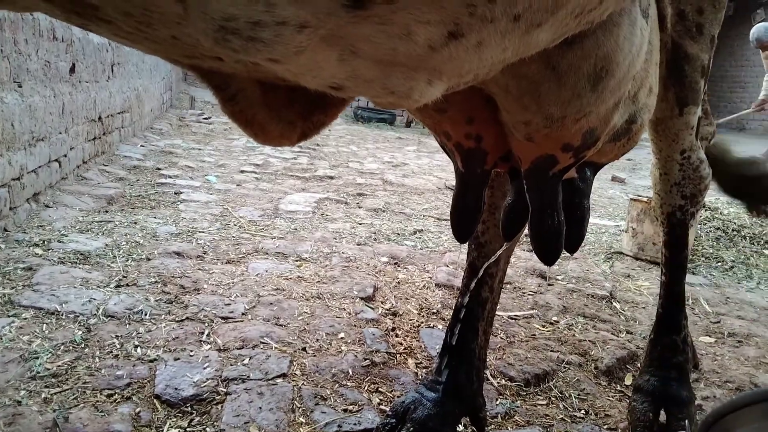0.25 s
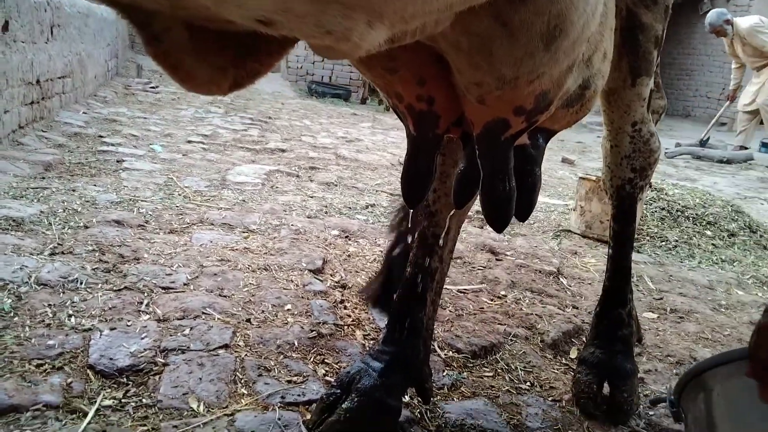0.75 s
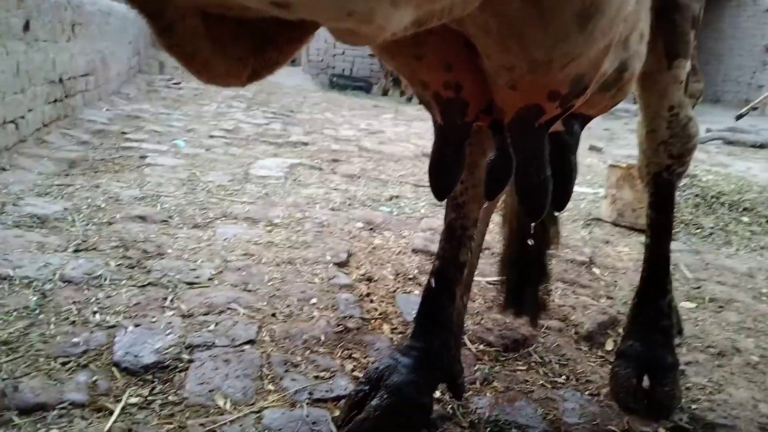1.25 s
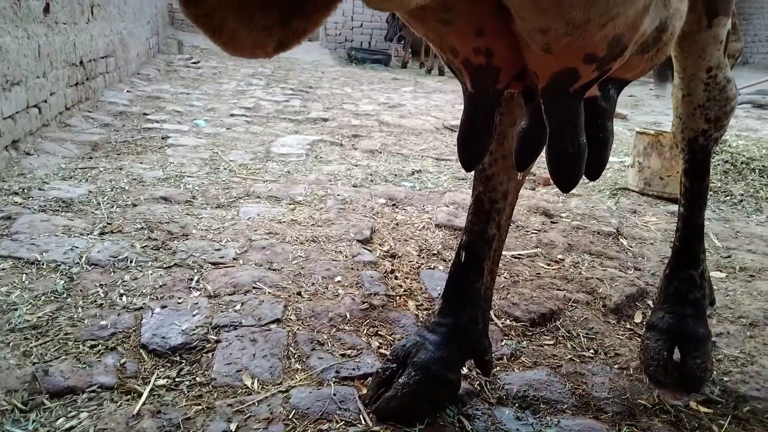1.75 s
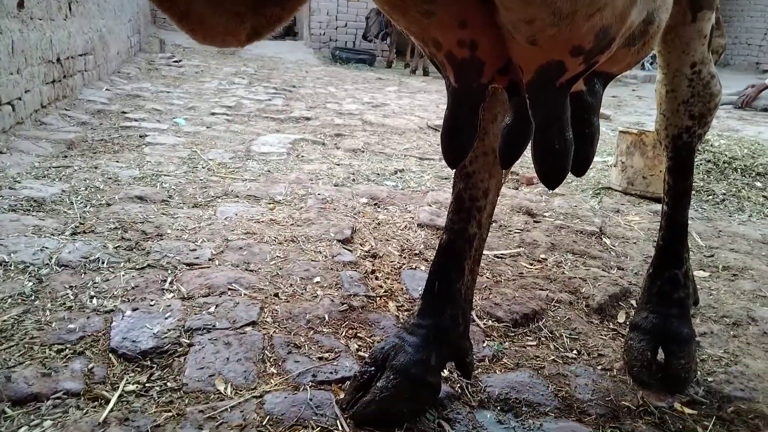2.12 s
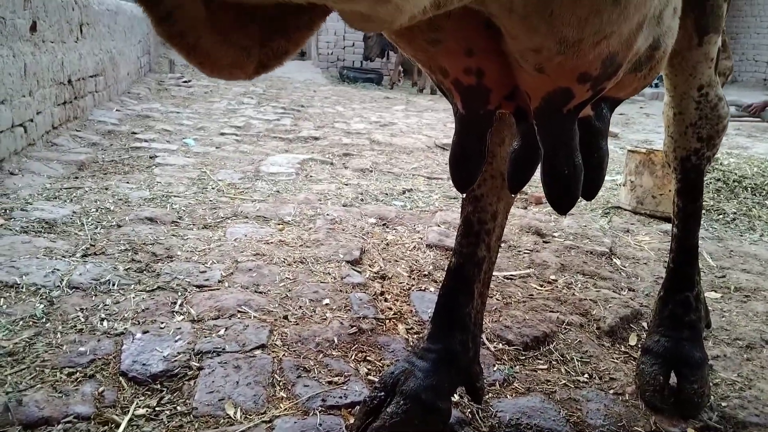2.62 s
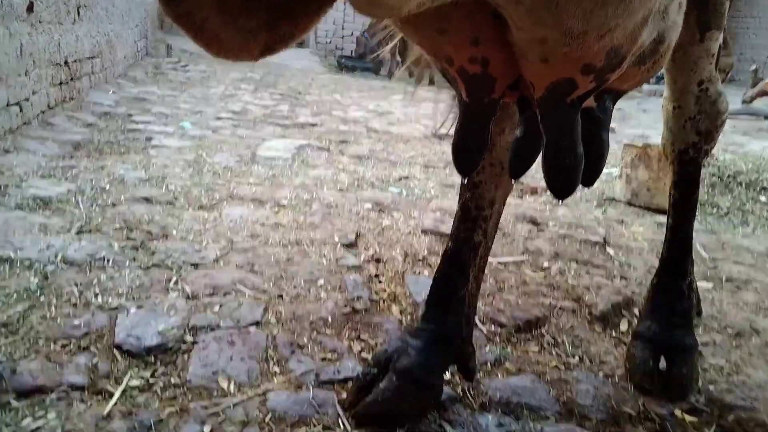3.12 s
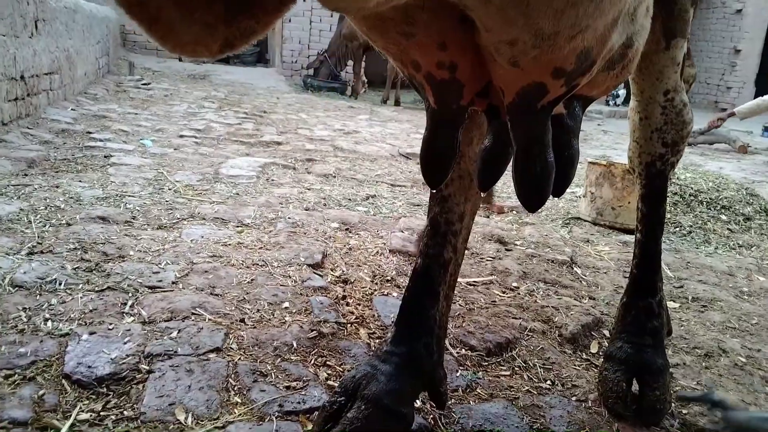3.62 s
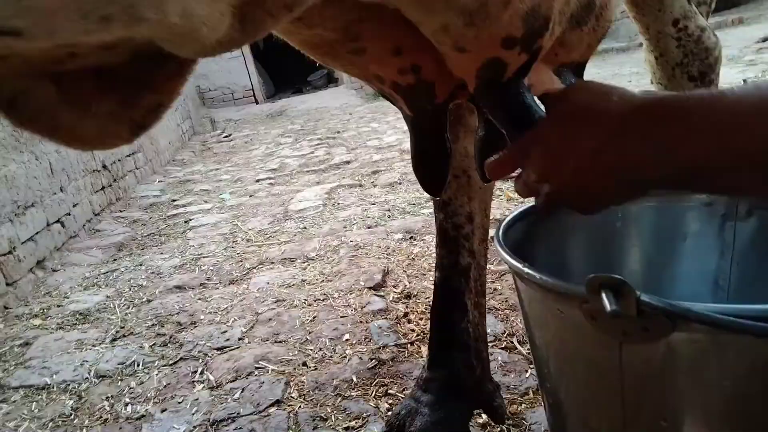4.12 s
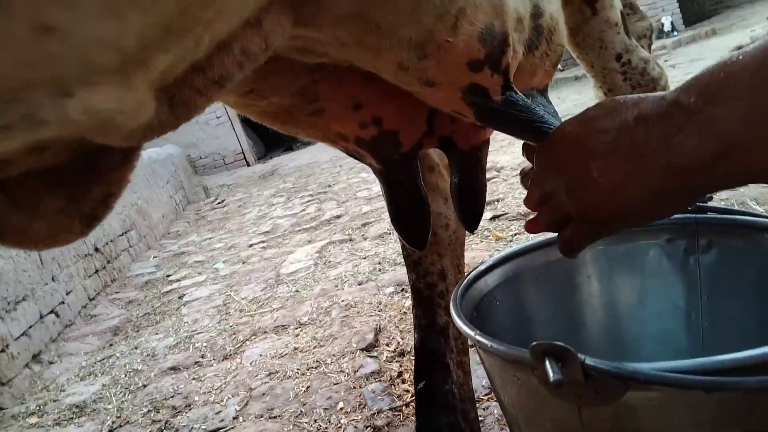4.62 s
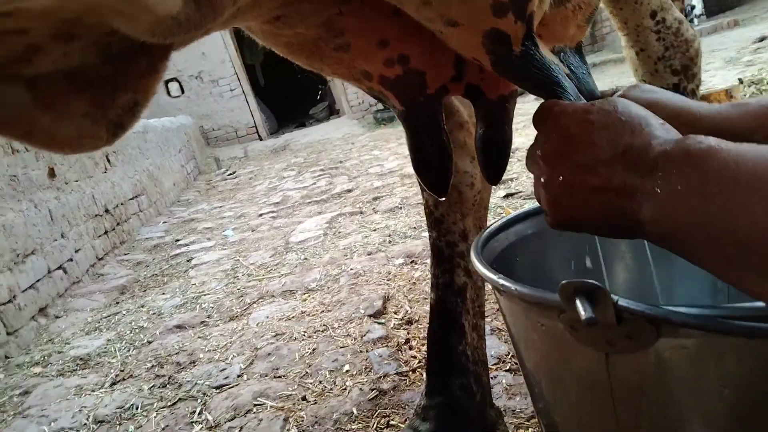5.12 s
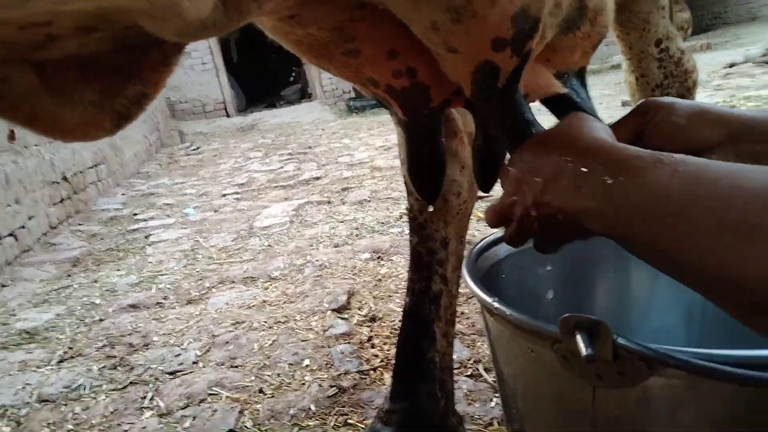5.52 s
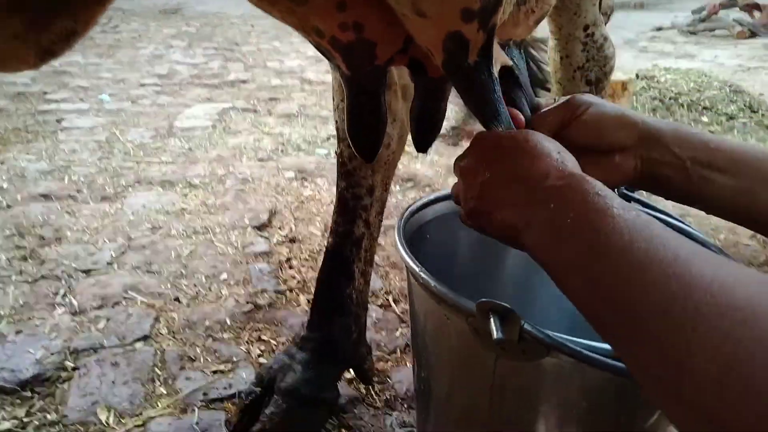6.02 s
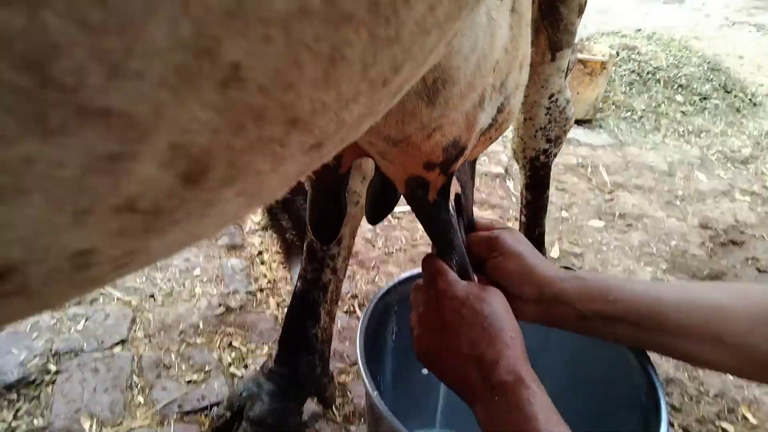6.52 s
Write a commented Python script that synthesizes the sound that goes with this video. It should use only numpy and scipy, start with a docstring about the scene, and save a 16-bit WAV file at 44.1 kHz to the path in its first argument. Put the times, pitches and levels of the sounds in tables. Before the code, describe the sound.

A dry, close sound in a quiet open yard, with almost no background. From 0 to 1.3 seconds water moves lightly in a steel bucket: small drips, a few sharper plops and faint rings. From about 1.4 seconds it is swilled harder, with dense wet splashes, low hollow gurgles and a booming bucket body, rising and easing through 3.5 seconds. The biggest splash and deep glugs come at 3.7 to 3.95, then it drops away quickly. Soft broom-like swishes pass at about 4.2, 4.4 and 4.6, where a quick double metallic knock lands. From 4.93 to 5.4 a jet of milk hisses and drums on bare steel, ringing tinnily. Another faint swish follows, then a short clank at 5.67 and two quieter brushes near 5.9 and 6.1. At 6.25 a second jet strikes, hollower, with low gulps, fading by 6.7. Dull ground bumps run underneath.

```python
"""Milking yard with a steel bucket

Water is slopped about in the bucket: patchy noise and drops, splashes, gurgling air pockets and a hollow boom.
Knocks excite damped steel modes; two jets of milk, one after the other, hiss and drum on the bare steel.
Broom-like strokes of noise come and go, with faint rings, dull bumps through the ground and a faint hush.
"""
import sys
import numpy as np
from scipy import signal
from scipy.fft import rfft, irfft
from scipy.io import wavfile
from scipy.ndimage import uniform_filter1d

SR = 44100
rng = np.random.default_rng(int(sys.argv[2]) if len(sys.argv) > 2 else 0)


def store_pcm(level_fs):
    """Save levels as 16-bit WAV."""
    pcm = np.round(np.clip(level_fs, -1, 1) * 32767).astype(np.int16)
    wavfile.write(sys.argv[1], SR, np.atleast_2d(pcm).T)


N = 297675
TIME = np.arange(N) / SR

# spectrum of moving water: (frequency [Hz], relative density [dB])
WATER_COLOUR = [(410, -28), (700, -6.5), (797, -5.5), (1020, 1.5), (1210, -2.5), (1490, 3), (1780, -0.5),
                (2920, -3.5), (4540, -16), (5800, -12), (8790, -37.5), (12500, -37), (15600, -43)]
# spectrum of the broom strokes and the hush: (frequency [Hz], relative density [dB])
BROOM_COLOUR = [(110, -69.5), (180, -24), (292, -10), (327, -24.5), (387, 3), (425, -5), (594, -6.5),
                (1020, -10), (1230, -2), (1330, -1), (1540, -2), (1890, -8.5), (5270, -15.5), (8410, -32),
                (15600, -35)]
# wall modes: (frequency [Hz], width [Hz], level at first jet's landing [dB], level at second's [dB])
WALL_MODES = [(957, 14, -7, -15), (1021, 16, -8, -9), (1119, 14, -5, -13), (1191, 15, -11, -7),
              (1305, 28, -14, -6), (1504, 22, -8, -12), (1550, 28, -9, 0), (1652, 20, -14, -6),
              (1712, 18, -5, -12), (1805, 22, -2, -9), (1885, 28, 2, -3), (2200, 40, -8, -12),
              (2310, 30, -7, -8), (2400, 20, -5, -13), (2500, 35, -7, -7), (2600, 25, -13, -8),
              (2736, 24, -7, -13), (3020, 32, -14, -11), (3296, 30, -18, -11), (4580, 30, -19, -18),
              (5640, 50, -17, -20), (6090, 30, -13, -20), (6370, 40, -15, -20)]


def gain_of(db):
    """Decibels to an amplitude factor."""
    return 10 ** (np.asarray(db) / 20)


def evened(x):
    """Scales to rms 1."""
    return x / np.sqrt(np.mean(x ** 2) + 1e-20)


def add(mix, start_s, sound):
    """Mixes a sound in from start_s."""
    part = mix[round(start_s * SR):][:len(sound)]
    part += sound[:len(part)]


def played(rows):
    """Gains from the dB columns of a timed table, silent outside it."""
    time_s, *columns = np.transpose(rows)
    return [gain_of(np.interp(TIME, time_s, db, -200, -200)) for db in columns]


def resonate(x, hz, width_hz):
    """One two-pole resonance of peak gain about 1."""
    r = np.exp(-np.pi * width_hz / SR)
    b = [(1 - r * r) / 2, 0, -(1 - r * r) / 2]
    a = [1, -2 * r * np.cos(2 * np.pi * hz / SR), r * r]
    return signal.lfilter(b, a, x)


def ringing(x, modes):
    """Sum of the resonances of a body."""
    return sum(gain_of(db) * resonate(x, hz, width_hz) for hz, width_hz, db in modes)


def coloured(x, points):
    """Filters by the table, interpolated over log frequency; rms 1."""
    point_hz, point_db = np.transpose(points)
    hz = np.fft.rfftfreq(len(x), 1 / SR)
    db = np.interp(np.log(hz + 1), np.log(point_hz), point_db)
    return evened(irfft(rfft(x) * gain_of(db), len(x)))


def lifted(x, hz, db):
    """Raises or cuts the treble above hz by db."""
    highpass = signal.butter(2, hz, "high", fs=SR, output="sos")
    treble = signal.sosfiltfilt(highpass, x)
    return x + (gain_of(db) - 1) * treble


def lumpy(flicker_db, clump_s):
    """Noise whose strength flickers by flicker_db rms, as drops land in clumps."""
    clumps = evened(uniform_filter1d(rng.standard_normal(N), max(round(clump_s * SR), 1)))
    return evened(rng.standard_normal(N) * gain_of(flicker_db * clumps))


def patchy(x, patchy_db):
    """Drops of one size come in groups: short patches of time and pitch stand out."""
    z = signal.stft(x, nperseg=512)[2]
    across_pitch = uniform_filter1d(rng.standard_normal(z.shape), size=5, axis=0)
    patches = evened(uniform_filter1d(across_pitch, size=6, axis=1))
    return evened(signal.istft(z * gain_of(patchy_db * patches), nperseg=512)[1][:N])


def blow(t, rise_s, t60_s):
    """Quick rise, exponential fall of 60 dB in t60_s."""
    return (1 - np.exp(-t / rise_s)) * gain_of(-60 * t / max(t60_s, .02))


def swell(start_s, end_s, db, rise_db_per_s, fall_db_per_s):
    """Gain that climbs to db, holds from start to end and sinks, linearly in dB."""
    before_s = np.maximum(start_s - TIME, 0)
    after_s = np.maximum(TIME - end_s, 0)
    return gain_of(db - rise_db_per_s * before_s - fall_db_per_s * after_s)


def wash():
    """Patchy water noise with single drops, and the hollow boom of the bucket."""
    # (time [s], water level [dB], boom level [dB])
    wash_levels = [(0.0, -56, -51), (0.15, -77.5, -100), (0.43, -68.5, -88), (0.46, -44.5, -58),
                   (0.6, -62.5, -58), (0.82, -48, -59.5), (1.12, -56, -72), (1.15, -43.5, -44),
                   (1.31, -40, -50), (1.42, -54, -58), (1.45, -34.5, -40), (1.68, -47.5, -40),
                   (1.85, -37.5, -37), (2.03, -50.5, -52.5), (2.33, -36.5, -44), (2.42, -52.5, -44.5),
                   (2.55, -52.5, -48), (2.6, -43, -55.5), (2.83, -44.5, -52), (2.9, -51.5, -52),
                   (3.06, -56, -45.5), (3.09, -50.5, -46), (3.4, -41, -37), (3.5, -39, -53.5),
                   (3.64, -57.5, -61), (3.74, -36.5, -43), (3.89, -38, -37.5), (4.1, -57.5, -58)]
    # air and walls of the bucket, applied twice: (frequency [Hz], width per pass [Hz], gain per pass [dB])
    air_modes = [(313, 7.9, 4.5), (393, 172, 4), (542, 100, 0)]
    gain, hollow = played(wash_levels)
    noise = patchy(coloured(lumpy(1.86, 0.011), WATER_COLOUR), patchy_db=5.5)
    water = .8 * noise + .6 * droplets(per_s=500, spread_db=4.5)
    boom = evened(ringing(ringing(lumpy(5.5, 0.039), air_modes), air_modes))
    return gain * (lifted(water, 6600, 6.5) + ticks()) + hollow * boom


def droplets(per_s, spread_db):
    """Single small drops: short rising blips of many pitches, a few of them large."""
    out, t = np.zeros(N), np.arange(600) / SR
    pitches_hz = np.geomspace(900, 7000, num=16)
    for hz in pitches_hz:
        size = gain_of(spread_db * np.minimum(rng.exponential(1, N), 4))
        hits = size * (rng.random(N) < per_s / len(pitches_hz) / SR)
        cycles = hz * t
        blip = np.sin(2 * np.pi * cycles * (1 + 0.0072 * cycles)) * cycles * np.exp(-cycles / 3.8)
        out += signal.oaconvolve(hits, blip / np.linalg.norm(blip))[:N]
    return coloured(out, WATER_COLOUR)


def ticks():
    """Fine spray bursting on the wall: brief noise ticks at random moments, treble cut."""
    # (time [s], level against the wash [dB])
    tick_levels = [(0.0, -24), (1.4, -29), (3.25, -26), (3.32, -18), (4.1, -13)]
    ticks_per_s = 70
    size = gain_of(5 * np.minimum(rng.exponential(1, N), 3))
    hits = size * (rng.random(N) < ticks_per_s / SR)
    envelope = signal.oaconvolve(hits, blow(np.arange(1500) / SR, .0008, 0.041))[:N]
    bursts = envelope * rng.standard_normal(N)
    return played(tick_levels)[0] * evened(lifted(bursts, 5300, -43))


def splashes():
    """Each splash is a burst of spray plus one size of drop ringing at its own pitch."""
    # (time [s], peak [dB], drop pitch [Hz], spray against drops [dB], spray treble lift [dB])
    splash_rows = [(0.0263, -42, 3190, 5, 35), (0.1955, -45.5, 3320, -25, 39),
                   (0.2858, -43.5, 1870, -16, 15), (0.3135, -46.5, 2680, -15.5, 11),
                   (0.365, -57, 2110, -14, 16), (0.4477, -32, 1440, 9, 10), (0.5437, -40.5, 3240, -12, 13),
                   (0.5854, -40.5, 3000, -2, 13), (0.621, -36, 1570, -8, 0), (0.6634, -38, 2680, -11, -5),
                   (0.6894, -42, 1336, -2, 14), (0.7307, -37, 1420, -4, 11), (0.821, -35, 3380, -13, 14),
                   (0.8998, -25.5, 1514, -14.5, 18.5), (0.9423, -37.5, 1550, 3, 26),
                   (1.0195, -36.5, 1460, -1, 11), (1.0959, -44, 2450, -15, 9), (1.146, -32.5, 1190, -4, 9),
                   (1.2103, -34.5, 2680, -4, 18), (1.333, -34, 1490, -12, 15), (1.3778, -39, 2720, -4, -1),
                   (1.4351, -26, 1030, -22, -7), (1.476, -21, 1330, -1, 4), (1.5298, -30.5, 1930, 10, -2),
                   (1.5702, -27.5, 3180, -4, 10), (1.5967, -25.5, 1720, 6, 1),
                   (1.6387, -26.5, 1015, 3, 7.5), (1.709, -29, 1650, -8.5, 14), (1.764, -28, 1330, -11, -9),
                   (1.8149, -21.5, 2216, -1, 2), (1.8494, -32, 1490, -10, -12), (1.8862, -25, 1480, -5, -9),
                   (1.9473, -28, 1730, 7, 0), (2.075, -35, 1590, -2, 2), (2.138, -30.5, 1310, -8, 1),
                   (2.159, -29, 1040, 1, 11), (2.2125, -31.5, 2340, 0, 14), (2.2543, -46, 1420, -5, 7),
                   (2.291, -35, 1420, -7, 5), (2.3487, -28, 930, -5.5, 4), (2.427, -28, 960, -9, 0),
                   (2.4877, -41, 1560, 0, 26), (2.579, -27.5, 2280, -12.5, 15),
                   (2.6254, -26.5, 1060, -4.5, 0), (2.673, -25, 1685, 1, 13.5),
                   (2.7171, -24.5, 1700, -3.5, 2.5), (2.7722, -29, 1405, 1, -14),
                   (2.8368, -29, 1460, -2, -6), (2.9053, -38.5, 1310, -2, 11), (2.93, -34, 2100, -2, 5),
                   (2.991, -33.5, 1650, 5, 6), (3.017, -31, 2300, 1, 3.5), (3.038, -38.5, 1500, -2, 12),
                   (3.0769, -24.5, 1530, -7, 4.5), (3.1384, -27, 1680, -3, -17),
                   (3.1714, -33.5, 2140, -7, 3), (3.2125, -30, 1372, -8, 10),
                   (3.3022, -29.5, 1310, -10, 17), (3.3385, -25, 2480, -2, 8), (3.3807, -25, 1260, -11, 0),
                   (3.4357, -24.5, 1510, 12, 4.5), (3.4631, -22, 1480, -10, -1), (3.4894, -43, 1300, 0, 20),
                   (3.5944, -46, 1600, -2, 26), (3.6685, -34.5, 1220, -7, 8), (3.6985, -29, 2190, -10, 13),
                   (3.7306, -18.5, 1345, 4, -6), (3.7605, -17, 1030, 1.5, -2.5), (3.8551, -29, 1300, -9, 9),
                   (3.901, -30.5, 1470, -9, 14), (4.0006, -39, 1850, -10, 20),
                   (4.0448, -37.5, 1680, -14, 10)]
    rise_s, spray_t60_s, drops_t60_s = 0.0014, 0.15, 0.089
    out, t = np.zeros(N), np.arange(10240) / SR
    noises = rng.standard_normal((len(splash_rows), 2, len(t)))
    for (s, db, hz, spray_db, treble_db), (wide, narrow) in zip(splash_rows, noises):
        spray = gain_of(spray_db) * lifted(coloured(wide, WATER_COLOUR), 3100, treble_db)
        drops = evened(resonate(resonate(narrow, hz, 130), hz, 130))
        sound = blow(t, rise_s, spray_t60_s) * spray + blow(t, rise_s, drops_t60_s) * drops
        add(out, s - .002, gain_of(db) * sound / abs(sound).max())
    return out


def gurgles():
    """Air pockets closing under water ring at their own pitch, rising a little, shaken by the water."""
    # (time [s], level before rise and decay [dB], starting pitch [Hz], t60 [s])
    gurgle_rows = [(0.456, -33, 354.5, 0.19), (0.488, -26.5, 391.6, 0.21), (0.522, -35.5, 376.4, 0.41),
                   (0.56, -37, 379, 0.17), (0.909, -45, 377.5, 0.57), (1.025, -39, 304.5, 0.18),
                   (1.474, -21.5, 305, 0.053), (1.508, -22, 302, 0.24), (1.584, -29, 325, 0.17),
                   (1.709, -26, 442, 0.061), (1.849, -39, 303, 0.053), (1.88, -32, 293, 0.14),
                   (1.947, -19, 310, 0.095), (2.047, -19.5, 358, 0.035), (2.276, -42, 331, 0.19),
                   (2.308, -24.5, 324, 0.074), (2.432, -37, 306, 0.16), (2.527, -34, 265.5, 0.23),
                   (2.671, -38, 860, 0.099), (2.729, -36, 917, 0.14), (2.753, -29.5, 336, 0.091),
                   (2.816, -24.5, 491, 0.1), (2.839, -21.5, 375, 0.056), (2.866, -31.5, 320, 0.076),
                   (2.99, -35, 352, 0.15), (3.159, -50, 542, 0.065), (3.197, -28, 509, 0.14),
                   (3.21, -21, 588, 0.087), (3.38, -36, 400, 0.16), (3.439, -35.5, 400, 0.19),
                   (3.686, -37, 310, 0.071), (3.738, -24, 370, 0.12), (3.752, -21, 508, 0.37),
                   (3.757, -17.5, 593, 0.16), (3.796, -13, 322.5, 0.24), (3.858, -18.5, 334.5, 0.17),
                   (3.901, -18.5, 278, 0.14), (3.931, -17.5, 294.4, 0.18), (3.93, -31.5, 698, 0.23),
                   (3.95, -28.5, 580, 0.24), (4.363, -53, 534, 0.38), (4.02, -36.5, 329, 0.18),
                   (4.501, -38, 763, 0.14), (6.425, -22.5, 407.6, 0.34), (6.53, -27.5, 409, 0.17),
                   (6.615, -28.5, 309.4, 0.24)]
    rise_s, wobble_share = 0.0079, 0.44
    out, t = np.zeros(N), np.arange(12000) / SR
    shake = rng.standard_normal((len(gurgle_rows), len(t)))
    for (s, db, hz, t60_s), noise in zip(gurgle_rows, shake):
        tone = np.sin(2 * np.pi * hz * (t + .2 * t ** 2))
        wobble = evened(resonate(resonate(noise, hz, 90), hz, 90))
        add(out, s - .004, gain_of(db) * blow(t, rise_s, t60_s) * (tone + wobble_share * wobble))
    return out


def knocks():
    """A sharp push with a little grit, the damped steel modes and a dull thump."""
    # (time [s], knock level [dB], thump level before rise and decay [dB], thump pitch [Hz])
    knock_rows = [(4.6215, -53, -13.5, 153), (4.6281, -21.5, -38, 325), (4.6418, -21, -40, 322),
                  (4.6708, -30, -26.5, 170), (5.666, -17.5, -30, 360), (5.697, -26, -30, 420),
                  (5.766, -39, -40, 380)]
    out, t = np.zeros(N), np.arange(6000) / SR
    cracks = rng.standard_normal((len(knock_rows), len(t)))
    u = t / .00022
    push = -2.5 * u * (2 - u) * np.exp(-u)
    for (s, db, thump_db, hz), noise in zip(knock_rows, cracks):
        grit = coloured(noise, WATER_COLOUR) * blow(t, 0.0008, 0.014)
        steel = evened(ringing(noise, np.array(WALL_MODES)[:, :3])) * blow(t, 0.00044, 0.062)
        thump = -np.sin(2 * np.pi * hz * t) * blow(t, 0.0033, 0.028)
        knock = push + 0.23 * grit + 0.11 * steel
        add(out, s - .0005, gain_of(db) * knock + gain_of(thump_db) * thump)
    return out


def jets():
    """A jet breaks into a dense hail of drops: hiss, steel modes kept ringing, and a bottom boom."""
    # one table a jet: (time [s], force [dB], boom of the bucket bottom [dB])
    jet_levels = [
        [(4.916, -70, -88), (4.93, -38.5, -48), (4.95, -27, -34.5), (5.0, -21, -42), (5.09, -18.5, -47),
         (5.148, -22.5, -50), (5.25, -23, -42), (5.42, -41, -46.5), (5.6, -64, -82)],
        [(6.224, -55, -64), (6.24, -35, -45), (6.288, -21, -39), (6.405, -19.5, -44), (6.44, -18, -34),
         (6.5, -22, -30), (6.626, -32.5, -37), (6.7, -35, -40), (6.75, -43, -42)],
    ]
    # hiss, one table a jet: (frequency [Hz], relative density [dB])
    hiss_colours = [
        [(290, -61), (500, -81), (792, 2.5), (864, -41), (928, -28), (1140, -7), (1410, -1), (1820, 6),
         (2050, -5), (2360, -3.5), (4080, -10), (6290, -4.5), (8150, -25.5), (15600, -12)],
        [(290, -41.5), (500, -10), (569, -14.5), (792, -11), (851, -27), (1040, -27), (1430, 2), (1560, -13),
         (1720, -6.5), (2610, -15.5), (3860, -17), (5680, -14), (9010, -32.5), (15600, -17.5)],
    ]
    # applied twice: (frequency [Hz], width per pass [Hz], first jet's gain per pass [dB], second's [dB])
    bottom_modes = [(308, 11.6, -9.5, 2.5), (327, 9.7, 5.5, -3), (395, 32, 7.5, -5), (415.7, 33.5, 7.5, 5),
                    (502, 73, -23.5, -1), (799, 14, -5, 3)]
    steel_share = 0.83  # amplitude; the hiss takes the rest of the power
    out = np.zeros(N)
    for k, rows in enumerate(jet_levels):
        force, hollow = played(rows)
        hiss = force * patchy(coloured(lumpy(0.57, 0.036), hiss_colours[k]), patchy_db=2.0)
        walls = np.array(WALL_MODES)[:, [0, 1, 2 + k]]
        bottom = np.array(bottom_modes)[:, [0, 1, 2 + k]]
        # the landing spot wanders, so two sets of modes swell and fade apart
        steel = evened(sum(ringing(lumpy(1.6, .04) * force, walls[half::2]) for half in (0, 1)))
        force_rms = np.sqrt(np.mean(force ** 2))
        sound = np.sqrt(1 - steel_share ** 2) * hiss + steel_share * force_rms * steel
        boom = evened(ringing(ringing(lumpy(1.5, .03), bottom), bottom))
        out += lifted(sound, 8550, -17.5) + hollow * boom
    return out


def swish():
    """Many bristles at once: nearly plain noise swelling with each stroke, its treble faster."""
    # (full from [s], full until [s], body level [dB], treble lift [dB])
    strokes = [(4.03, 4.047, -53, -9), (4.153, 4.197, -43.5, 1), (4.357, 4.417, -47.5, -2),
               (4.564, 4.638, -45, -2.5), (5.338, 5.442, -42, 0.5), (5.665, 5.675, -47.5, 12),
               (5.876, 5.932, -49, 8.5), (6.093, 6.15, -49, 7)]
    rates_db_per_s = np.array([121, 149])  # rise, fall of the body
    treble_steepness = 1.64
    bristles = patchy(coloured(lumpy(.5, 0.0033), BROOM_COLOUR), patchy_db=3.5)
    body = lifted(bristles, 2500, -60)
    treble = bristles - body
    out = np.zeros(N)
    for start_s, end_s, db, treble_db in strokes:
        out += swell(start_s, end_s, db, *rates_db_per_s) * body
        out += swell(start_s, end_s, db + treble_db, *rates_db_per_s * treble_steepness) * treble
    return out


def rings():
    """Faint fuzzy tones, narrow resonant noise at a steady pitch, that die away."""
    # (time [s], level before rise and decay [dB], pitch [Hz], t60 [s])
    ring_rows = [(.002, -52.5, 655, 0.37), (.002, -72, 1410, 0.25), (0.116, -61, 1500, 0.12),
                 (.345, -68, 816, 0.75), (.265, -69, 710, .15), (0.628, -48, 1414, 0.58),
                 (0.731, -57, 956, 0.86), (0.921, -36.5, 1440, 0.27), (4.09, -47.5, 1206, 0.56),
                 (.29, -69, 1010, 0.24), (.29, -56, 1910, .4), (.3, -58, 2900, .4), (4.5, -44.5, 802, 0.22),
                 (4.75, -58, 720, 0.34)]
    out, t = np.zeros(N), np.arange(16000) / SR
    shake = rng.standard_normal((len(ring_rows), len(t)))
    for (s, db, hz, t60_s), noise in zip(ring_rows, shake):
        width_hz = 0.059 * hz  # per pass
        tone = evened(resonate(resonate(noise, hz, width_hz), hz, width_hz))
        add(out, s, gain_of(db) * blow(t, 0.0046, t60_s) * tone)
    return out


def rumble():
    """Hooves and feet through the ground: low lumpy noise that jumps with each bump and dies away."""
    # (time [s], level [dB])
    bumps = [(0.06, -63), (0.5, -56.5), (0.66, -56), (1.038, -50.5), (1.35, -50.5), (1.66, -39.5),
             (1.95, -51.5), (2.08, -56.5), (2.3, -44), (2.6, -48.5), (2.72, -66), (2.89, -62),
             (3.11, -53.5), (3.46, -50.5), (3.741, -32.5), (4.0, -52), (4.19, -56.5), (4.32, -60),
             (4.47, -58), (4.619, -46), (5.2, -46), (5.4, -42.5), (5.68, -44), (5.9, -52), (6.1, -52),
             (6.34, -47), (6.6, -52)]
    # (frequency [Hz], relative density [dB])
    ground_colour = [(15, -92), (25, -62), (48, -40.5), (109, -5.5), (200, -14), (231, -17), (260, -6.5),
                     (340, -1.5), (570, -120)]
    gain = sum(swell(s, s, db, rise_db_per_s=500, fall_db_per_s=109) for s, db in bumps)
    return gain * coloured(lumpy(2.5, .05), ground_colour)


def scene():
    """Sums all sources over a faint yard hush, the same in both channels."""
    hush = gain_of(-84.5) * coloured(rng.standard_normal(N), BROOM_COLOUR)
    mono = wash() + splashes() + gurgles() + rings() + swish() + knocks() + jets() + rumble() + hush
    return np.array([mono, mono])


def record(dry):
    """A small microphone drops the deep bass; then a low-pass limits the band."""
    edge_hz = 15650
    thin = signal.sosfilt(signal.butter(2, 60, "high", fs=SR, output="sos"), dry)
    lowpass = signal.firwin(511, edge_hz, window=("kaiser", 9), fs=SR)
    return signal.oaconvolve(thin, lowpass[None], "same")


dry = scene()
out = record(dry)
store_pcm(out)
```